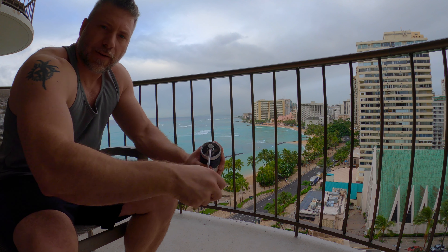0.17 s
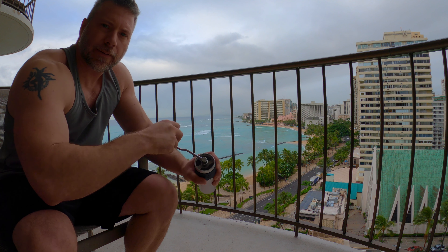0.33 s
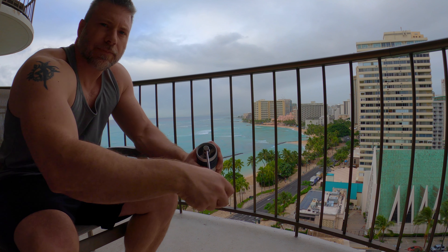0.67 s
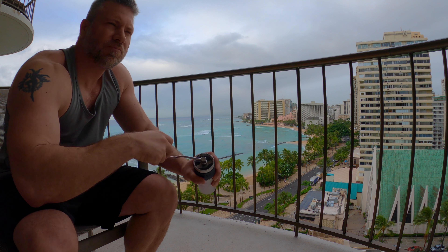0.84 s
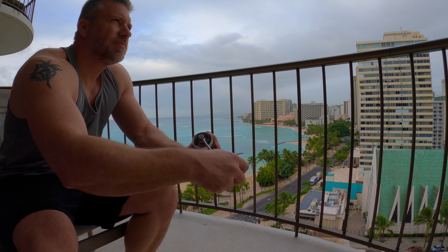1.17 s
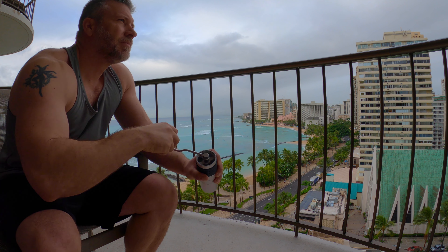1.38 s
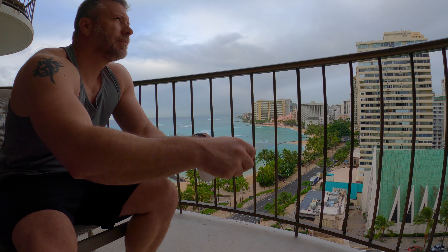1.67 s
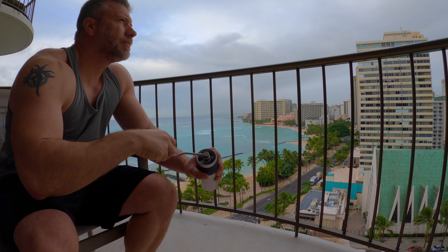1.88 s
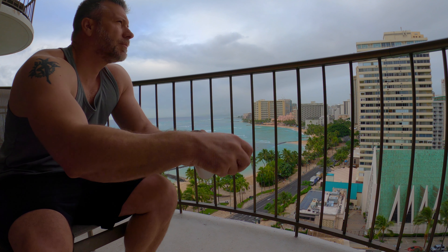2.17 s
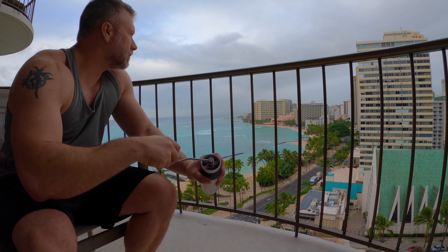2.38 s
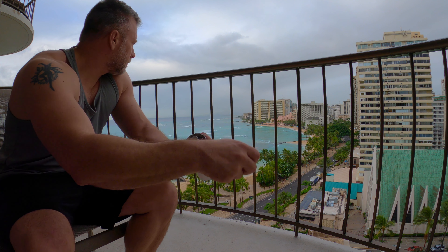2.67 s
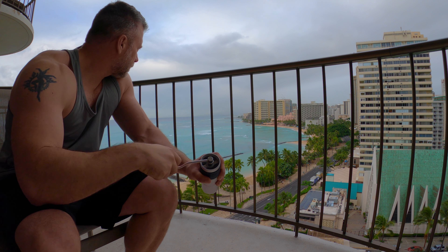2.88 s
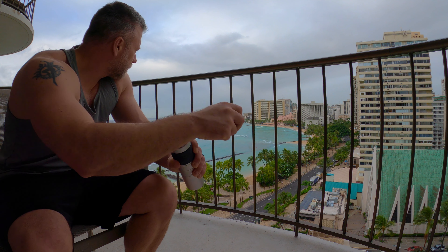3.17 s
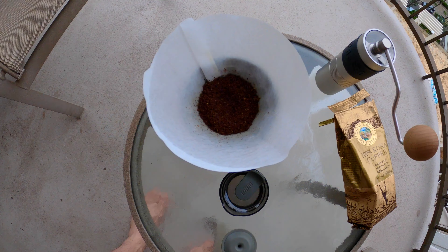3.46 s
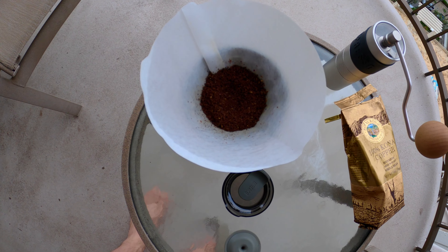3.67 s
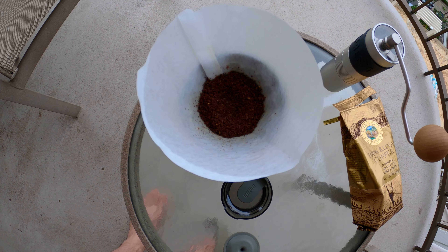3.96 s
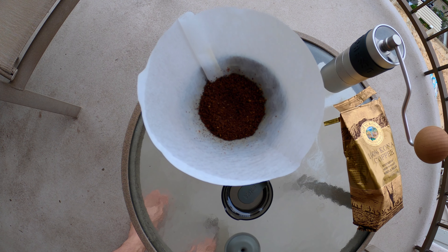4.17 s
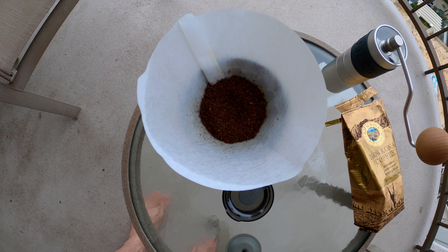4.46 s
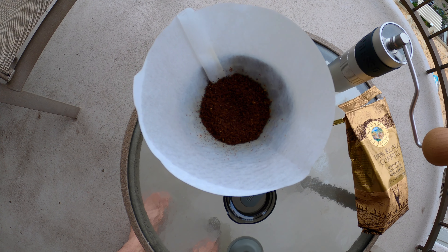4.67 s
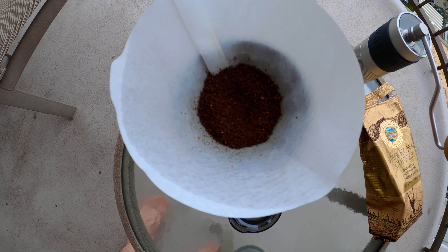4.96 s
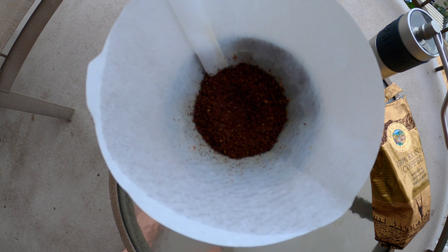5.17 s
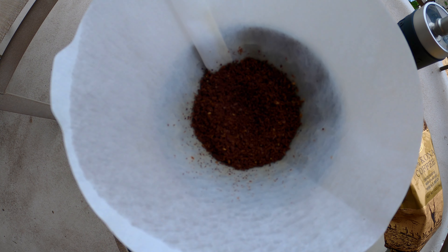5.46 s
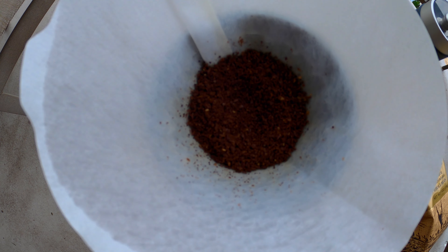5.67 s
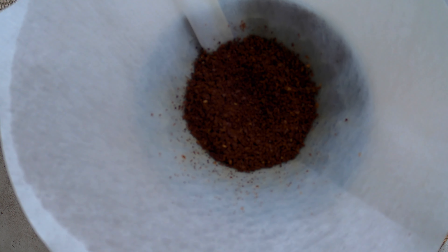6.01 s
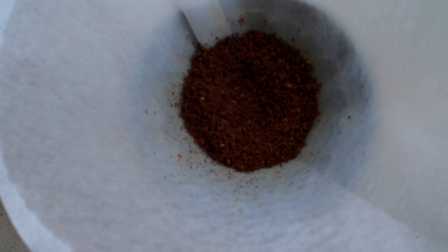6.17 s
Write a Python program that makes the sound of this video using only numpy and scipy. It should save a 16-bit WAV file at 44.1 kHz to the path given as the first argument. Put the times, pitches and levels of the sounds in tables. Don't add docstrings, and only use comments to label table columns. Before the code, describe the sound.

A hand grinder crunches coffee beans in a fast, bright crackle over balcony wind, then cuts to quiet airy rumble with a fading gust.

```python
import sys
import numpy as np
from scipy import signal
from scipy.fft import rfft, irfft
from scipy.io import wavfile
from scipy.ndimage import uniform_filter1d

SR = 44100
rng = np.random.default_rng(int(sys.argv[2]) if len(sys.argv) > 2 else 0)


def gain_from_decibels(decibels):
    exponent = np.asarray(decibels, float) / 20
    return 10 ** exponent


def put_to_file(sound):
    columns = np.atleast_2d(sound).T
    safe = np.clip(columns, -1, 1)
    whole_steps = np.round(safe * 32767)
    wavfile.write(sys.argv[1], SR, whole_steps.astype(np.int16))


N = 279594
T = np.arange(N) / SR
HZ = np.fft.rfftfreq(N, 1 / SR)
BACK_S = 3.655

# t/s, peak level/dB, ring f/Hz
SPLITS = [(0.0748, -35.5, 2850), (0.088, -34, 2990), (0.1364, -24.5, 3340), (0.327, -26.5, 3840),
          (0.3347, -27.5, 3400), (0.4385, -31, 2510), (0.5750, -15.5, 3730), (0.6217, -23.5, 3700),
          (0.6245, -15, 3750), (0.645, -27.5, 3630), (0.778, -26, 3000), (0.852, -18.5, 4050),
          (1.0946, -30, 3080), (1.162, -33, 2760), (1.4007, -26.5, 2800), (1.4663, -25, 3040),
          (1.5399, -30, 4000), (1.5946, -35, 4300), (1.6232, -23, 4000), (1.7464, -28, 2880),
          (2.0452, -25, 4040), (2.146, -46, 2900), (2.1924, -30.5, 3140), (2.382, -29.5, 2530),
          (2.4136, -29.5, 2920), (2.5367, -30.5, 2520), (2.9592, -28, 2720), (3.043, -36, 2850),
          (3.1446, -25, 3970), (3.4175, -38, 3120)]
# t/s, peak level/dB, ring f/Hz, grinder's top edge against the ring/dB
CHIPS = [(0.1341, -38, 8680, -20), (0.1664, -30.5, 8410, -17), (0.312, -34.5, 8630, -23),
         (0.3915, -38.5, 8680, -25), (0.5752, -32, 9450, -27), (0.6245, -37, 8700, -17),
         (0.774, -31.5, 7850, -17), (0.7785, -34, 6100, -12), (0.7825, -37.5, 8000, -12),
         (0.852, -17.5, 8100, -27.5), (0.8894, -39.5, 8580, -20.5), (0.991, -32, 8550, -19),
         (1.0799, -37, 8240, -20), (1.1149, -39.5, 7800, -24), (1.1618, -40.5, 8200, -19),
         (1.36, -34.5, 8190, -24), (1.5399, -35.5, 8240, -17.5), (1.623, -31, 8040, -21),
         (2.0283, -41, 8580, -5), (2.0453, -32.5, 8370, -4), (2.1465, -40, 7520, -16),
         (2.194, -31, 8900, -24), (2.383, -35.5, 8300, -29), (2.5444, -35.5, 8650, -20.5),
         (2.7826, -45, 8650, -6), (2.9594, -31, 9700, -22.5), (3.037, -36, 9480, -11.5),
         (3.0664, -36.5, 9170, -10), (3.086, -38.5, 8740, -9), (3.424, -36.5, 8700, -28),
         (3.4797, -34.5, 8650, -22)]
# f/Hz, width/Hz, level/dB
BODY = [(1560, 240, -0.5), (1800, 280, 1), (2360, 400, 2.5), (3034, 460, 1.5)]
NECK = [(3750, 460, -2), (4098, 260, -3), (4520, 480, -5)]
RIM = [(5550, 240, -7.5), (6250, 510, -3.5), (7200, 1200, -7.5)]


def grinder():
    return grinding() + gain_from_decibels(-4.0) * beans() + gain_from_decibels(-5.0) * chips() + drag()


def grinding():
    # t/s, crunch level/dB, how much the metal rubs above the crunch/dB
    crank_load = [(0.04, -48.5, 4.5), (0.15, -40.5, -4), (0.22, -47.5, -2), (0.44, -43, -1.5),
                  (0.55, -44, -2), (0.65, -43.5, 2), (0.745, -60, 4), (0.785, -45, -1.5), (1.23, -47, 1.5),
                  (1.6, -42, -1), (1.72, -45, -1.5), (2.1, -42.5, 2), (2.29, -47.5, -2.5),
                  (2.5, -40.5, -2.5), (2.78, -47, -5), (3.02, -40, 0), (3.34, -49, 5), (3.46, -40.5, -4)]
    # f/Hz, width/Hz, level/dB
    burr = [(8240, 1000, 4), (8680, 430, 4), (9630, 1000, 1.5), (11970, 800, -5.5), (13600, 1500, -8.5),
            (14940, 1500, -16)]
    turn_db, contact_db = over_time(crank_load)
    load_db = turn_db + 1.5 * walk(90)
    coarse_db = load_db + fragments(SPLITS, doubles_db=-27)
    fine_db = load_db + fragments(CHIPS, doubles_db=-34.5)
    neck_db = coarse_db - 8.5 + 0.69 * contact_db
    scrape_db = fine_db - 15 + 0.78 * contact_db
    grit_db = fine_db - 17 + contact_db
    coarse = crunch(BODY, coarse_db - 2.8, rate=900, spread_db=4.5, colour_db=2.0, crumble=0.3)
    neck = crunch(NECK, neck_db, rate=700, spread_db=4.5, colour_db=3.0, crumble=0.19)
    scrape = crunch(RIM, scrape_db, rate=920, spread_db=1.0, colour_db=5.5, crumble=0.13)
    grit = crunch(burr, grit_db, rate=930, spread_db=1.0, colour_db=4.0, crumble=0.18)
    return coarse + neck + scrape + grit


def crunch(modes, load_db, rate, spread_db, colour_db, crumble):
    grind = int(3.6 * SR)
    chance = rng.random((16000, 2))
    when = np.cumsum(-np.log(chance[:, 0]) * SR / rate).astype(int)
    size = gain_from_decibels(np.minimum(-spread_db * np.log(chance[:, 1]), 10))
    size, when = size[when < grind], when[when < grind]
    out = 0
    for hz, width_hz, db in modes:
        blows = crumble * rng.standard_normal(grind)
        share = rng.standard_normal((len(when), 2))
        push = np.sign(share[:, 0]) * gain_from_decibels(colour_db * np.clip(share[:, 1], -2, 2))
        np.add.at(blows, when, size * push)
        grip = gain_from_decibels(1.5 * walk(25.3)[:grind])
        out = out + level(ring(blows * grip, hz, width_hz), db)
    return np.pad(level(out, 0), (0, N - grind)) * gain_from_decibels(load_db)


def fragments(table, doubles_db):
    lasting_s = 0.016
    kicks = np.zeros(N)
    for s, db, *_ in table:
        kicks[int(s * SR)] += gain_from_decibels((db - doubles_db) / 2)
    extra = signal.lfilter([1], [1, -np.exp(-1 / (lasting_s * SR))], kicks)
    return 20 * np.log10(1 + extra)


def beans():
    # t/s, peak level/dB, ring f/Hz
    lesser_splits = [(0.101, -32, 2230), (0.1293, -22, 2390), (0.3112, -26.5, 2400), (0.3507, -25, 2310),
                     (0.3914, -39, 2850), (0.403, -29, 2200), (0.6054, -26, 3790), (0.661, -24, 2570),
                     (0.7575, -39, 3250), (0.8034, -34, 2410), (0.8874, -32, 3150), (0.9383, -30, 3050),
                     (0.9747, -25, 2290), (0.9894, -28, 2460), (1.1146, -28, 4040), (1.257, -31, 2920),
                     (1.299, -30, 3820), (1.359, -27, 2660), (1.45, -24, 3000), (1.4835, -32, 3200),
                     (1.6427, -37, 2200), (1.8077, -28, 2450), (1.8744, -41, 2520), (1.908, -33, 4030),
                     (1.9265, -24, 2230), (1.9834, -30.5, 3040), (2.0234, -29.5, 4160),
                     (2.0784, -33.5, 3030), (2.2067, -24.5, 2300), (2.4508, -34.5, 2250),
                     (2.6354, -32, 2360), (2.8254, -37.5, 2700), (2.8804, -38, 2900), (2.9324, -28, 2500),
                     (3.0014, -37, 2440), (3.0647, -28, 3070), (3.1383, -26, 2360), (3.1994, -33, 2370),
                     (3.2268, -24, 2210), (3.3378, -35, 2370), (3.407, -31, 4060), (3.4456, -26, 2440),
                     (3.498, -25, 4620)]
    tube = [(1177, 420, 2.5)] + BODY + NECK + [(hz, width_hz, db - 8) for hz, width_hz, db in RIM]
    rows = [(s, db, hz, -3) for s, db, hz in [*SPLITS, *lesser_splits]]
    return cracks(rows, tube, own_width=0.15, tail_ms=9.8, tail_db=-12, strike=10)


def chips():
    # t/s, peak level/dB, ring f/Hz, top edge against the ring/dB
    lesser_chips = [(0.1615, -39, 8140, -16), (0.2124, -43, 6660, -26), (0.335, -40.5, 8530, -24),
                    (0.4024, -41, 8680, -29.5), (0.4336, -41, 7850, -21.5), (0.5062, -43.5, 8390, -20.5),
                    (0.5332, -44, 8590, -21), (0.5984, -44, 8760, -11.5), (0.6644, -45, 8610, -26),
                    (1.0934, -39.5, 6820, -20), (1.2411, -45, 6630, -17), (1.2605, -45.5, 6610, -23),
                    (1.3009, -41, 6570, -26), (1.4204, -45, 7150, -25), (1.4501, -47.5, 8720, -22),
                    (1.4664, -46.5, 9240, -21), (1.511, -42, 8560, -15), (1.7464, -43, 6880, -20),
                    (1.7998, -44, 8380, -19), (1.8746, -45, 9420, -26), (1.9066, -47, 9030, -22),
                    (2.0043, -46, 8490, -14.5), (2.0684, -40.5, 6740, -16.5), (2.4129, -43, 8310, -27),
                    (2.5325, -44, 8640, -20), (2.575, -39, 8720, -20), (2.5894, -40, 8680, -20),
                    (2.6798, -42.5, 8770, -25), (3.0016, -48, 7440, -10), (3.1388, -43.5, 8770, -23),
                    (3.1436, -41, 8720, -24.5), (3.4072, -42, 6770, -25.5)]
    # f/Hz, width/Hz, level/dB
    top_edge = [(12120, 930, 3.5), (14000, 2100, -5.5)]
    snaps = [*CHIPS, *np.add(lesser_chips, (0, 2.5, 0, 0))]
    rows = [(s, db, hz, edge_db + 9) for s, db, hz, edge_db in snaps]
    return cracks(rows, top_edge, own_width=0.11, tail_ms=4.4, tail_db=-12.5, strike=6)


def cracks(rows, modes, own_width, tail_ms, tail_db, strike):
    break_ms, lead_s = 0.92, 0.0008
    out, t = np.zeros(N), np.arange(2048) / SR
    click = 1. * (t == 0)
    metal = sum(gain_from_decibels(db) * ring(click, hz, width_hz) for hz, width_hz, db in modes)
    for (s, db, hz, metal_db), noise in zip(rows, rng.standard_normal((len(rows), 2048))):
        tail = gain_from_decibels(tail_db) * np.exp(-t * 1000 / tail_ms)
        burst = noise * (np.exp(-t * 1000 / break_ms) + tail)
        burst[0] = strike
        own = ring(burst, hz, own_width * hz)
        sound = own + gain_from_decibels(metal_db) * signal.fftconvolve(burst, metal)[:2048]
        at = int((s + lead_s) * SR)
        out[at:at + 2048] += sound * gain_from_decibels(db) / abs(sound).max()
    return out


def drag():
    # f/Hz, width/Hz, level/dB
    slide_modes = [(3550, 600, 2), (4680, 700, 2), (5900, 1300, -1.5)]
    # from t/s, to t/s, f/Hz, level/dB
    singing = [(0.088, .2, 4200, -53), (.8, 0.836, 4150, -54), (.94, .99, 4040, -51),
               (1.03, 1.14, 4280, -55), (1.295, 1.32, 6440, -54), (1.32, 1.42, 5650, -53),
               (1.504, 1.545, 8600, -59), (2.003, 2.1, 4220, -52), (2.17, 2.24, 4050, -52),
               (3.12, 3.18, 1800, -43), (3.19, 3.225, 1560, -39), (3.15, 3.32, 4120, -53.5),
               (3.33, 3.39, 4800, -59), (3.399, 3.44, 4000, -50.5)]
    rub = rng.standard_normal(N)
    out = swell(1.243, 1.46, ramp_s=0.07) * gain_from_decibels(-51) * drones(slide_modes)
    for from_s, to_s, hz, db in singing:
        out = out + swell(from_s, to_s, ramp_s=0.017) * level(ring(rub, hz, 0.03 * hz), db)
    return out


def ports(mid):
    # f/Hz, level/dB
    scatter = [(60, -29), (110, -30), (200, -29), (380, -21), (700, -15), (1290, -12), (2380, -8),
               (4400, -7), (8120, -3), (15000, -1)]
    # f/Hz, level/dB
    left_lean = [(60, 0.0), (110, 0.0), (200, 0.0), (380, 0.0), (700, 0.5), (1290, 1.0), (2380, 1.5),
                 (4400, 1.0), (8120, -1.5), (15000, -4.0)]
    spectrum, lean_db = rfft(mid), over_hz(left_lean) / 2
    shifting = mid * 1.3 * np.clip(walk(120), -.9, .9)
    side = rfft(shifting) * gain_from_decibels(over_hz(scatter) + 0.3)
    left, right = (spectrum + side) * gain_from_decibels(lean_db), (spectrum - side) * gain_from_decibels(-lean_db)
    return irfft(np.array([left, right]), N)


def balcony_air():
    # f/Hz, level per Hz/dB
    colour = [(12, -34), (22, 0), (40, -3), (64, -3), (100, -2.5), (200, -1.5), (252, -4.5), (330, -2.5),
              (416, -9.5), (767, -13.5), (1200, -16.5), (1820, -19.5), (4070, -31.5), (8000, -45),
              (15500, -67.5)]
    # f/Hz, width/Hz, level/dB
    fans = [(52.8, 5.4, -39), (107, 19.4, -43), (306.4, 13, -48.5), (1052, 75, -46.5), (5740, 12, -78)]
    return air(colour, -31.5, breeze(), flicker_db=0.52) + drones(fans)


def breeze():
    # t/s, level/dB
    strength = [
        (0.0, 2),
        (0.16, -1),
        (0.4, -1.5),
        (1.2, 0),
        (1.41, 1),
        (1.6, -3.5),
        (2.16, 1.5),
        (2.45, -4),
        (3.09, 2.5),
        (3.3, -2.5),
    ]
    follow = (0.99, -0.068, 0.23, .1)
    return np.outer(follow, over_time(strength)[0])


def late_air():
    # f/Hz, level per Hz/dB
    colour = [(12, -30), (25, -6), (40, -8), (65, -13), (100, -5.5), (240, -8), (400, -15), (1000, -19),
              (2000, -30), (3500, -37), (6000, -51.5), (8500, -57.5), (10300, -65.5), (11000, -74),
              (11500, -115)]
    # f/Hz, width/Hz, level/dB
    fans = [(52.6, 4.8, -38.5), (86.3, 14.5, -39), (214, 20, -45), (299.7, 16, -46), (461, 62, -47.5),
            (612, 68, -48.5), (754, 17, -54.5)]
    return air(colour, -34.5, gust(), flicker_db=0.8) + drones(fans) + growl() + whine() + top_hiss()


def air(colour, db, rise, flicker_db):
    part_hz = (89.5, 490, 3500, 9000)
    shaped = rfft(rng.standard_normal(N)) * gain_from_decibels(over_hz(colour))
    spectrum = rfft(level(irfft(shaped, N), db))
    octave = np.log2(np.clip(HZ, 31.25, 16000) / 31.25)
    part_octave = np.log2(np.array(part_hz) / 31.25)
    out = 0
    for k in range(10):
        place = np.interp(k, part_octave, [0, 1, 2, 3])
        low = min(int(place), 2)
        band_db = rise[low] + (place - low) * (rise[low + 1] - rise[low]) + flicker_db * walk(9)
        band = irfft(spectrum * np.clip(1 - abs(octave - k), 0, 1), N)
        out = out + gain_from_decibels(band_db) * band
    return out


def gust():
    # peak level/dB, decay time/s
    parts = [
        (12, 0.21),
        (6.7, 0.34),
        (8.4, 0.9),
        (7.5, 1.16),
    ]
    late, lead_s = T - 3.875, 0.24
    rumble, *upper = (db * np.exp(np.where(late < 0, -(late / lead_s) ** 2, -late / fall_s))
                      for db, fall_s in parts)
    lorry_db = 7.5 * np.exp(-((T - 4.32) / 0.18) ** 2)
    return [rumble + lorry_db, *upper]


def growl():
    # f/Hz, width/Hz, level/dB
    engine = [(200, 50, -37.5), (590, 86, -43)]
    return swell(3.44, 4.4, ramp_s=0.34) * drones(engine)


def drones(table):
    return sum(level(ring(rng.standard_normal(N), hz, width_hz), db) for hz, width_hz, db in table)


def whine():
    # t/s, level/dB
    nearness = [
        (3.7, -60),
        (4.6, -58),
        (4.7, -48),
        (5.1, -50),
        (5.22, -53),
        (5.5, -50),
        (5.8, -53),
        (6.05, -51),
        (6.15, -49),
        (6.3, -50),
    ]
    hz = 1088 - 9.2 * (T - BACK_S) + 2.05 * walk(12)
    loudness = np.sqrt(2) * gain_from_decibels(over_time(nearness)[0] + 3.0 * walk(18))
    return loudness * np.sin(2 * np.pi * np.cumsum(hz) / SR)


def top_hiss():
    # f/Hz, level/dB
    top_colour = [(10500, -40), (11000, 0), (12600, -3), (13300, -40)]
    hiss = level(irfft(rfft(rng.standard_normal(N)) * gain_from_decibels(over_hz(top_colour)), N), -92)
    middle_s, half_length_s = 5.1, 0.55
    stirring = 1.6 * np.exp(-((T - middle_s) / half_length_s) ** 4)
    return hiss * np.clip(stirring - .3 + .35 * walk(14), 0, 1)


def level(x, db):
    return x * gain_from_decibels(db) / np.sqrt(np.mean(x ** 2))


def over_hz(points):
    hz, value = np.transpose(points)
    return np.interp(np.log(HZ + 1), np.log(hz), value)


def over_time(rows):
    s, *columns = np.transpose(rows)
    return [np.interp(T, s, c) for c in columns]


def ring(x, hz, width_hz):
    b, a = signal.iirpeak(hz, hz / width_hz / 1.5, fs=SR)
    return signal.lfilter(b, a, signal.lfilter(b, a, x))


def walk(rate):
    k = int(SR / rate)
    steps = np.repeat(rng.standard_normal(N // k + 1), k)
    return 1.88 * uniform_filter1d(uniform_filter1d(steps, k), k)[:N]


def swell(from_s, to_s, ramp_s):
    return np.clip(np.minimum(T - from_s, to_s - T) / ramp_s, 0, 1)


def scene():
    first = ports(grinder() + balcony_air())
    second = late_air()
    after = np.clip(T - 3.5095, 0, 1)
    smear = ring(first, 500, 1500) * gain_from_decibels(-35) * (after > 0) * (after < .021)
    fade_in = np.clip((T - BACK_S) / 0.062, 0, 1) ** 1.46
    fade_out = np.clip((T[-1] - T) / 0.004, 0, 1)
    return first * np.exp(-after / 0.0019) + smear + second * fade_in * fade_out


def roll_off(x):
    return signal.sosfilt(signal.butter(12, 15750, fs=SR, output="sos"), x)


def record(dry):
    top_cut = signal.ellip(10, .2, 70, 15700, fs=SR, output="sos")
    mix = signal.sosfilt(top_cut, dry)
    return roll_off(mix)


dry = scene()
out = record(dry)
put_to_file(out)
```